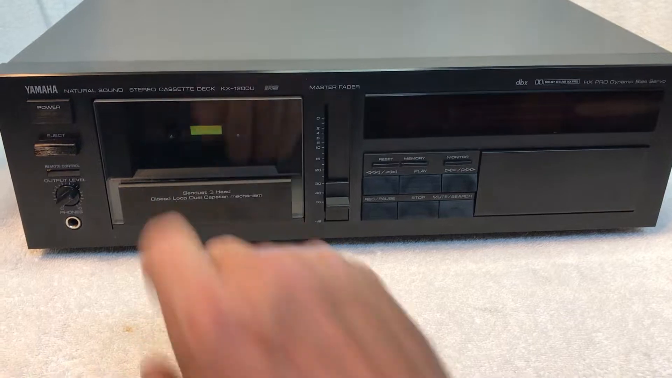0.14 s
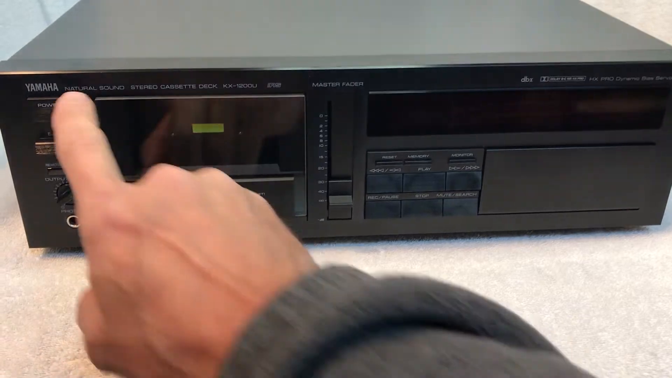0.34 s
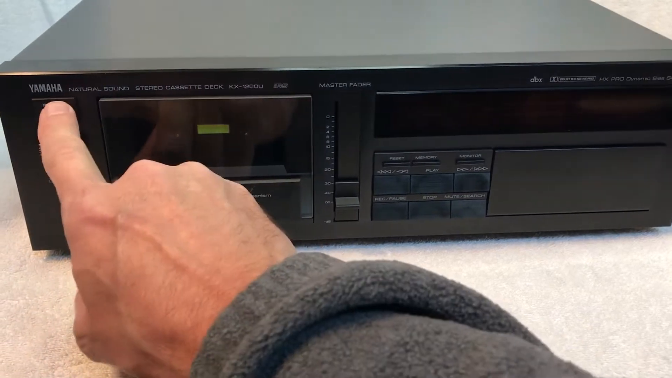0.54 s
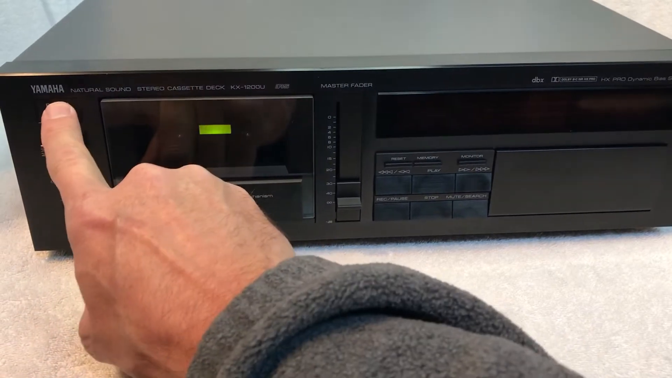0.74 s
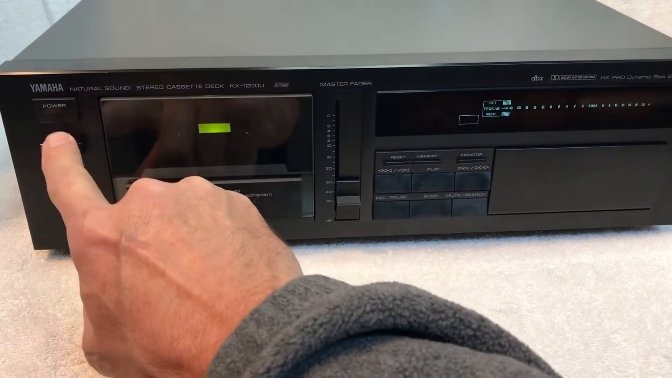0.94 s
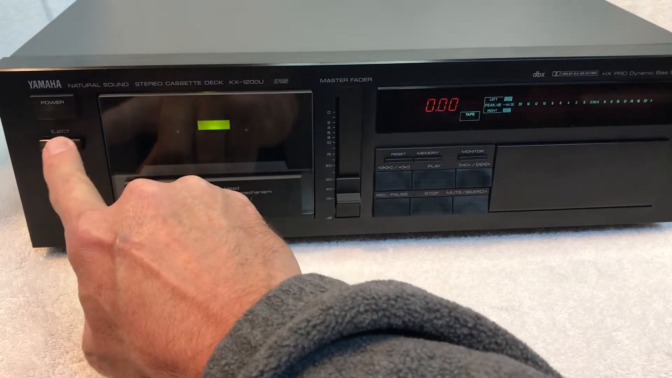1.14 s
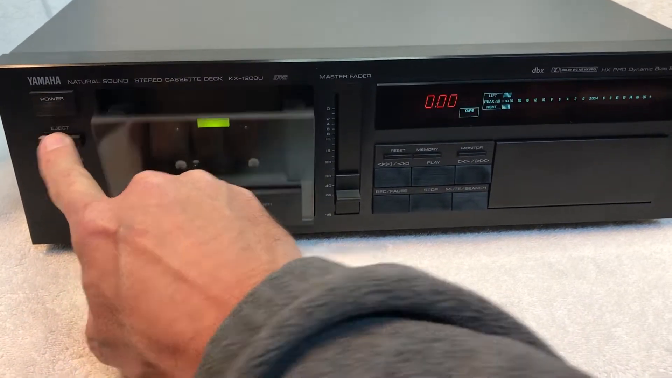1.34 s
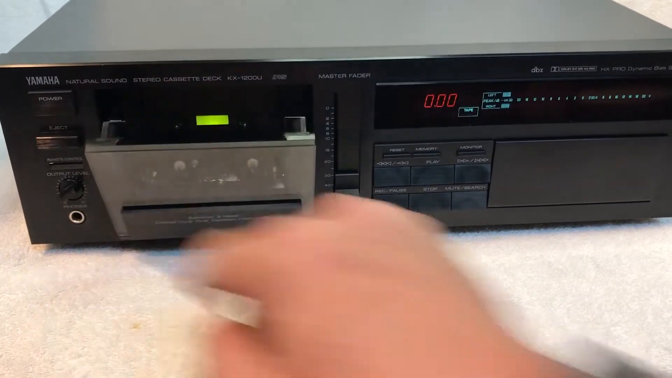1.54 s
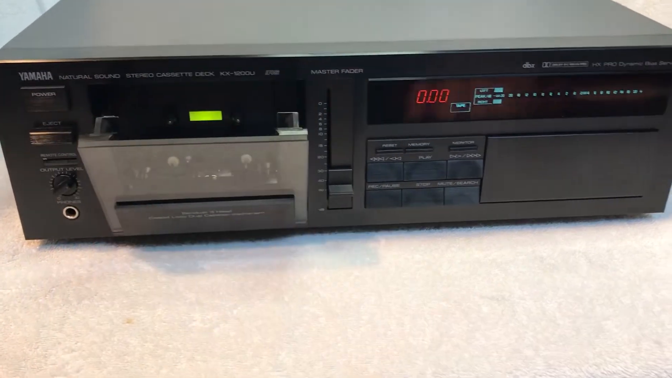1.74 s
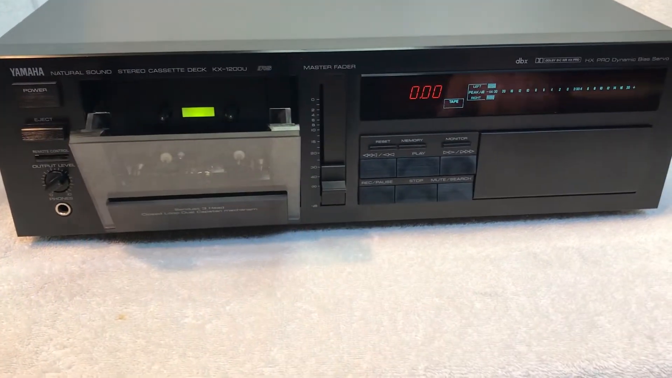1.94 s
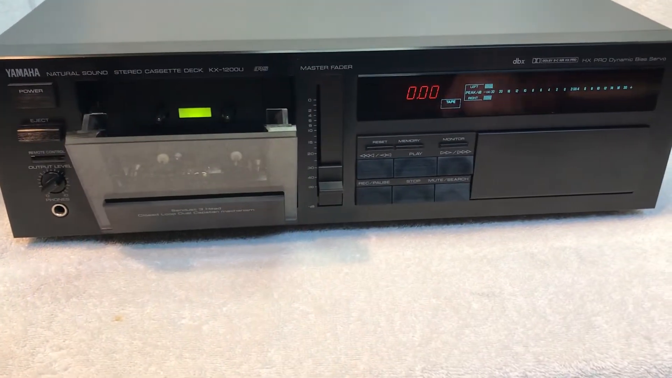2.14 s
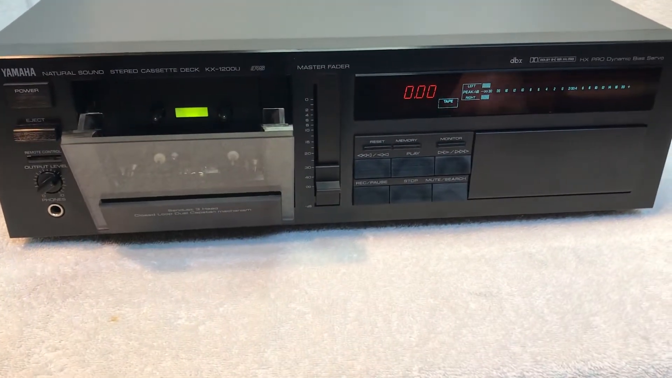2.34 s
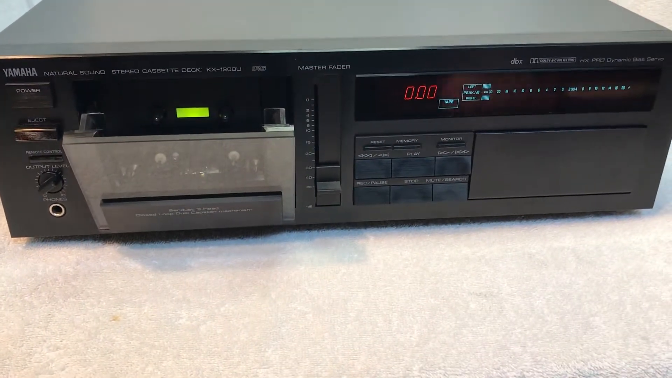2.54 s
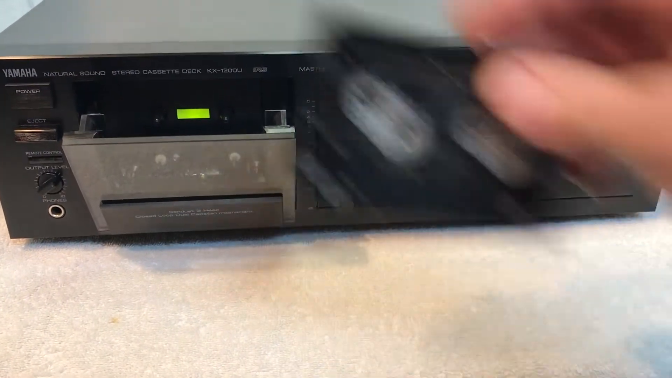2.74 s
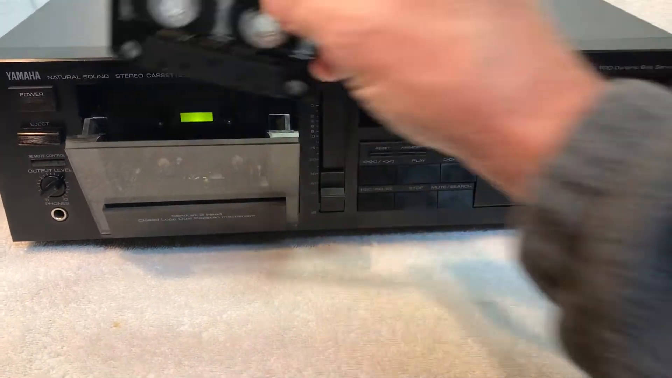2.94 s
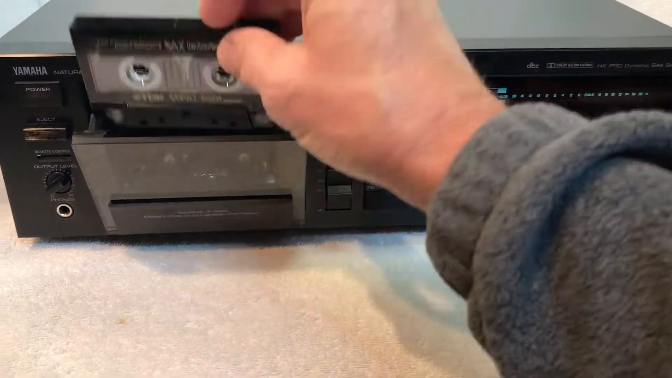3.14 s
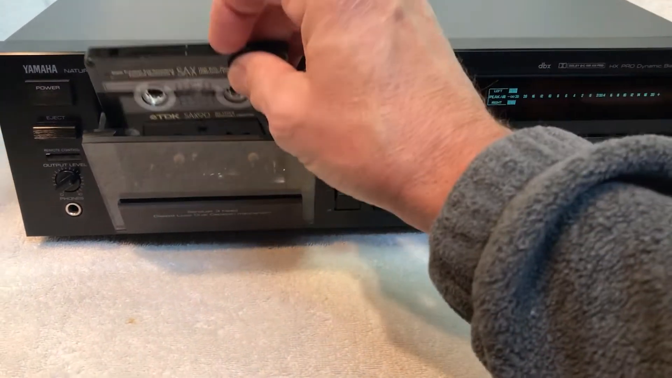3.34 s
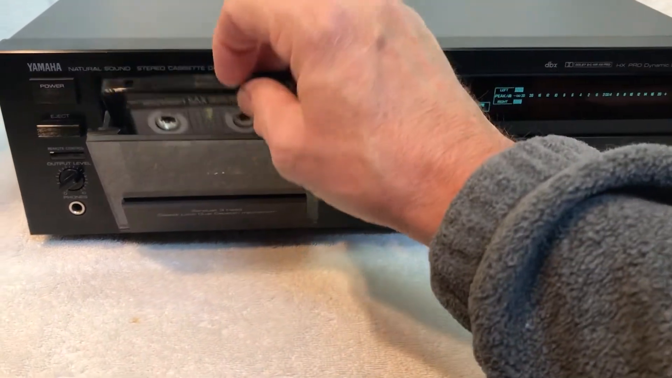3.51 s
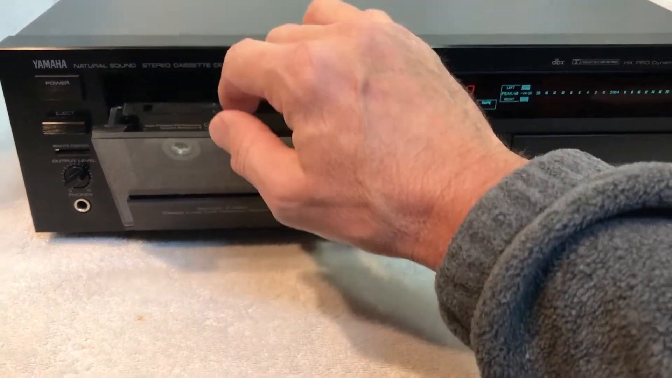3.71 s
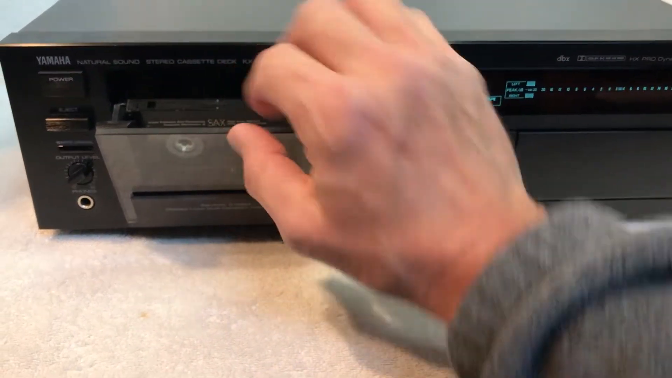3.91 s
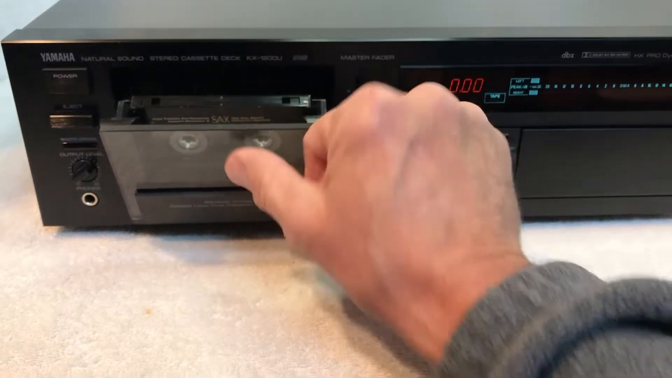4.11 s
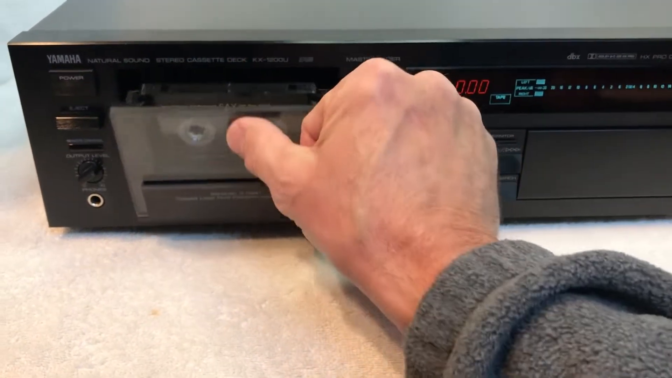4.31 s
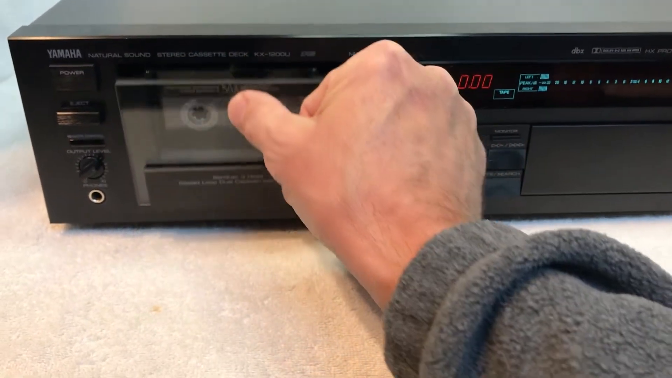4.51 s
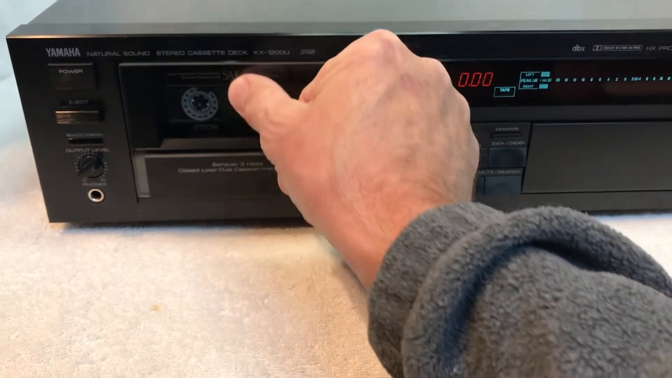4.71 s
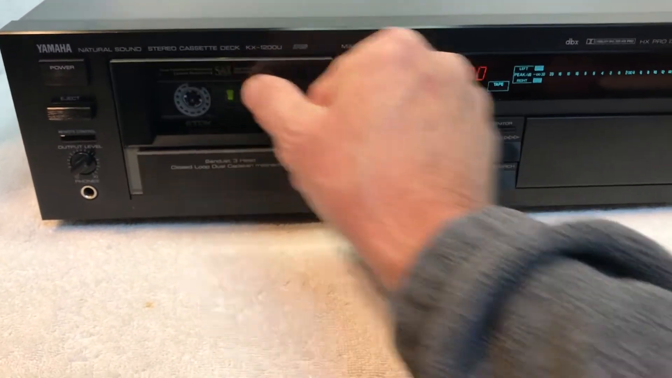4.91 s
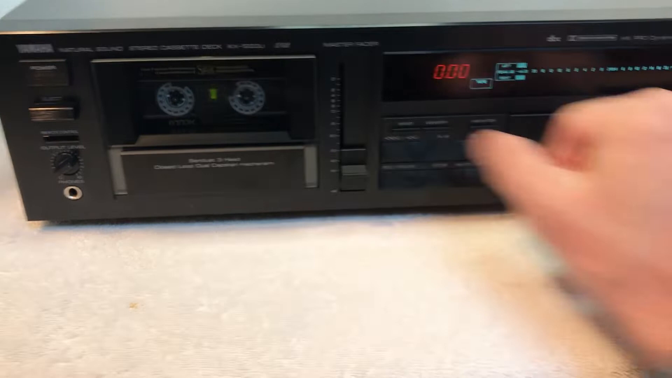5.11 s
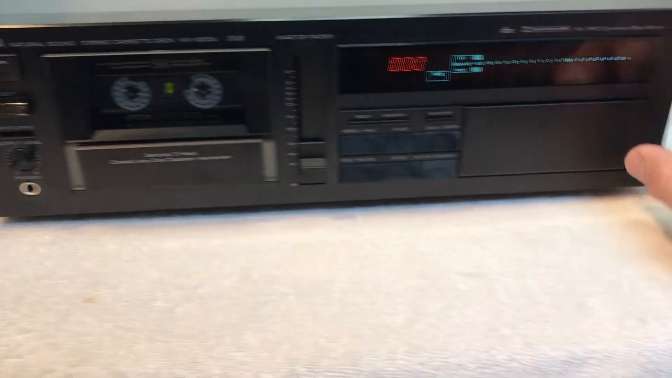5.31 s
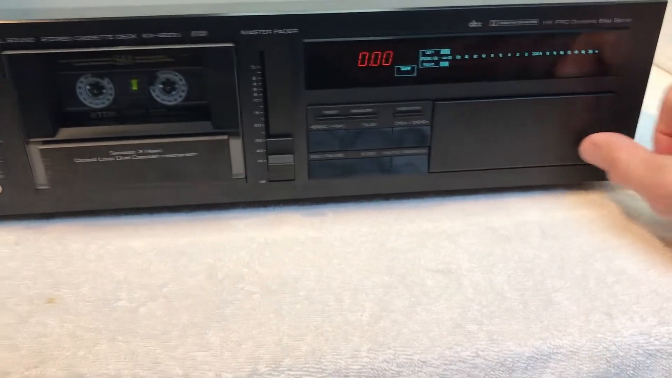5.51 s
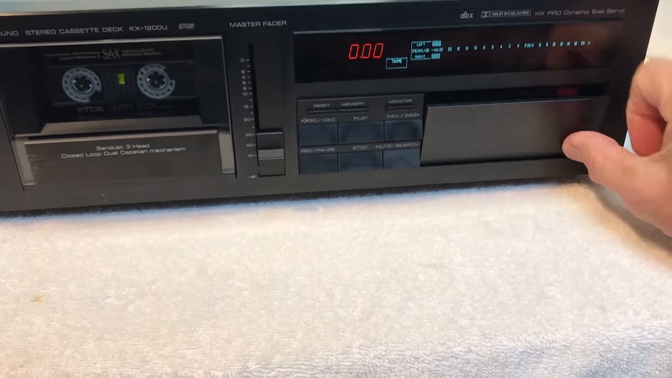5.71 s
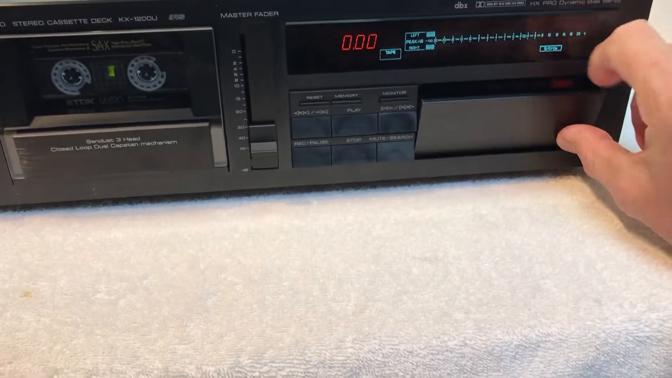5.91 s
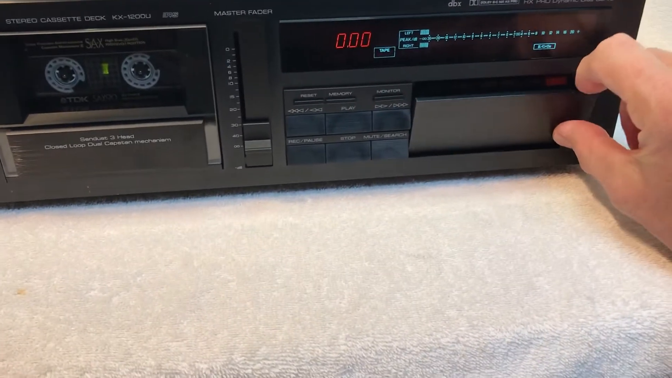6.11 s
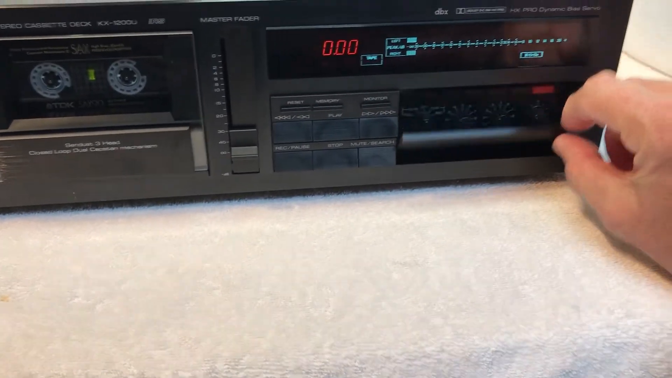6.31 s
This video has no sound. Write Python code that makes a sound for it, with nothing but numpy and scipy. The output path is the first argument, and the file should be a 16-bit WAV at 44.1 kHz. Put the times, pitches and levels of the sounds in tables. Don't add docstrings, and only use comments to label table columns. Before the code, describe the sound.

Dry plastic knocks on a deck standing on a towel, recorded about half a metre away. Keys click, the door clacks open, loose tape hubs chatter in the hand, and the shell scrapes down its guides to a firm clunk. After light fumbling the door snaps shut loudly, then a small cover opens with muted clicks. Low case rumble and thin microphone hiss lie underneath.

```python
import sys
import numpy as np
from scipy import signal
from scipy.fft import rfft, irfft
from scipy.io import wavfile
from scipy.ndimage import uniform_filter1d

SR = 44100
rng = np.random.default_rng(int(sys.argv[2]) if len(sys.argv) > 2 else 0)


def invert_db(level):
    return 10 ** (np.asarray(level, dtype=float) / 20)


def file_out(sig):
    cols = np.atleast_2d(sig).T
    lim = np.clip(cols, -1, 1)
    pcm = np.round(lim * 32767).astype(np.int16)
    wavfile.write(sys.argv[1], SR, pcm)


N = 280035


def band(x, lo_hz, hi_hz, order=2):
    return signal.sosfilt(signal.butter(order, [lo_hz, min(hi_hz, SR / 2.2)], "band", fs=SR, output="sos"), x)


def level(x, rms_db):
    return x * invert_db(rms_db) / np.sqrt(np.mean(x ** 2))


def decay(t, t60_s):
    return np.exp(-np.log(1000) * t / t60_s)


def coloured(points):
    hz, db = np.transpose(points)
    bin_hz = np.arange(N // 2 + 1) * SR / N
    gain = invert_db(np.interp(np.log(bin_hz + 1), np.log(hz), db))
    return irfft(rfft(rng.standard_normal(N)) * gain, N)


def flicker(rate_hz, spread_db):
    k = int(SR / rate_hz)
    steps = np.repeat(rng.standard_normal(N // k + 1), k)
    return invert_db(spread_db * uniform_filter1d(steps, k)[:N])


def pushed(t, pushes, rest_db, rise_db_s, fall_db_s):
    s, db = (c[:, None] for c in np.transpose(pushes))
    away_db = np.maximum(rise_db_s * (s - t), fall_db_s * (t - s))
    return np.sqrt(invert_db(rest_db) ** 2 + np.sum(invert_db(db - away_db) ** 2, axis=0))


def ring(modes, t):
    hz, db, t60_s = (c[:, None] for c in np.transpose(modes))
    chance = rng.standard_normal((3, len(modes), 1))
    gain = invert_db(db + 0.85 * chance[0]) * np.sign(chance[1])
    return np.sum(gain * decay(t, t60_s) * np.sin(2 * np.pi * hz * (1 + 0.013 * chance[2]) * t), axis=0)


def singing(t, parts):
    out, t = np.zeros(N + SR), t[:SR // 3]
    onset = np.clip(t / 0.00076, 0, 1)
    for s, hz, db, t60_s in parts:
        neighbours = level(band(rng.standard_normal(len(t)), hz * .97, hz * 1.03, order=1), -4.5)
        tone = np.sin(2 * np.pi * hz * t) + neighbours
        out[int(s * SR):][:len(t)] += invert_db(db) * tone * decay(t, t60_s) * onset
    return out[:N]


# f/Hz, density/dB
HISS = [(20, -32.5), (35, -9), (60, 5.5), (130, 7), (250, -5.5), (450, -3), (1000, -8), (2500, -10),
        (4800, -13.5), (6000, -12.5), (9300, -15), (10500, -16.5), (12000, -16), (15500, -21)]


def microphone_hiss():
    return level(coloured(HISS), -72) * flicker(12.0, 0.37)


# from t/s, to t/s
OVERLOAD = [
    (1.471, 1.868),
    (4.83, 5.222),
]
# f/Hz, density/dB
COARSE_HISS = [(100, -9.5), (600, -0.5), (1500, -3), (4000, -3.5), (8500, -7.5), (10500, -9),
               (15500, -10.5)]


def coarse_range_hiss(t):
    held = sum((t > start) & (t < end) for start, end in OVERLOAD)
    return held * level(coloured(COARSE_HISS), -65)


def room(x, t):
    t = t[:SR // 2]
    noise = rng.standard_normal(len(t)) * np.clip(t / 0.0054, 0, 1)
    low = band(noise, 150, 2200) * decay(t, 0.23)
    high = invert_db(-0.5) * band(noise, 4500, 13000) * decay(t, 0.1)
    tail = low + high
    return signal.fftconvolve(x, tail * invert_db(-16.5) / np.sqrt(np.sum(tail ** 2)))[:N]


# t/s, level/dB
THUDS = [(0.181, -73), (.8, -65), (1.27, -70), (1.47, -61), (1.66, -60.5), (3.27, -66), (3.59, -71),
         (3.8, -57.5), (4.33, -66), (4.76, -79), (5.31, -82), (6.07, -63), (6.33, -79)]


def table_thuds(t):
    thud = band(rng.standard_normal(N), 41, 80, order=3)
    return level(thud, 0) * pushed(t, THUDS, rest_db=-80.5, rise_db_s=260, fall_db_s=190)


# f/Hz, width/Hz, level/dB
CASE_RINGS = [(131.4, 10, 2), (187, 20, -0.5), (224, 41, 2), (249.5, 16, 4.5), (308.6, 30, -22.5)]
# t/s, level/dB
SHOVES = [(.2, -85), (.76, -58.5), (.96, -59), (1.333, -51.5), (1.47, -50.5), (1.58, -56.5), (1.67, -57.5),
          (3.378, -51.5), (3.55, -54.5), (3.69, -55), (3.799, -46.5), (3.92, -59.5), (4.07, -68),
          (4.33, -57), (4.55, -64), (4.69, -59), (4.831, -46), (4.96, -48.5), (5.575, -63), (5.62, -51.5),
          (5.715, -53), (5.779, -52), (6.08, -69.5), (6.2, -67.5)]


def case_drone(t):
    drone = np.zeros(N)
    for hz, width_hz, db in CASE_RINGS:
        mode = band(rng.standard_normal(N), hz - width_hz / 2, hz + width_hz / 2, order=1)
        drone += level(mode, db) * flicker(13, 2.5)
    return level(band(drone, 112, 1100), 0) * pushed(t, SHOVES, rest_db=-73.5, rise_db_s=243, fall_db_s=84.5)


# t/s, f/Hz, peak level/dB, t60/s
SINGING = [(1.468, 430, -47, .45), (1.468, 712, -56, .43), (3.78, 765, -53, .4), (3.78, 644, -51, .4),
           (3.781, 445, -49, .3), (.755, 6550, -58, 0.16), (2.707, 5280, -39, .04),
           (3.345, 11200, -53, 0.089), (3.776, 2350, -27, 0.04), (3.777, 1101, -30.5, .1),
           (3.78, 320.7, -45, 0.29), (.64, 950, -49, 0.067), (.95, 713, -52, 0.15),
           (3.8, 11050, -45, 0.062), (3.798, 2326, -29, 0.029), (4.724, 11200, -56, 0.17),
           (4.721, 4150, -56.5, 0.13), (4.837, 9580, -24.5, 0.022), (4.84, 1600, -33, 0.13),
           (4.276, 2330, -50, .04), (4.312, 2330, -47, .05), (4.707, 2350, -38, .04),
           (4.813, 208, -40, .12), (.753, 1050, -44, .08), (3.257, 560, -50, .06), (5.659, 2600, -46, .04),
           (5.578, 1780, -48, .05), (3.345, 3500, -50, .08), (6.155, 635.5, -64, 0.19),
           (6.21, 677, -71.5, 0.3)]
# t/s, f/Hz, peak level/dB
DECK_RINGS = [(.646, 1030, -47), (.768, 1030, -48), (.905, 4600, -46), (.905, 1010, -50), (.949, 700, -57),
              (0.95, 1900, -51), (1.233, 6030, -43), (1.234, 770, -56), (1.321, 750, -49),
              (1.326, 224, -46.5), (1.348, 200, -49), (1.387, 3090, -55), (1.467, 9600, -37.5),
              (1.471, 4070, -30.5), (1.47, 787, -41), (3.257, 1470, -48.5), (3.257, 3445, -56),
              (3.258, 5340, -52), (3.346, 1500, -42.5), (3.363, 5400, -44), (3.418, 2240, -57),
              (3.551, 1470, -51), (3.559, 4650, -55), (3.575, 2050, -53), (3.7505, 2200, -47.5),
              (3.756, 3480, -57), (3.776, 5730, -28), (3.7765, 7200, -33.5), (3.779, 3400, -32.5),
              (3.801, 5650, -46.5), (3.814, 6000, -53), (3.963, 1120, -56), (4.335, 2410, -59),
              (4.345, 2240, -57), (4.707, 5685, -48), (4.737, 2370, -42.5), (4.762, 2230, -50),
              (4.774, 1090, -51.5), (4.789, 2350, -52.5), (4.793, 2300, -51.5), (4.792, 4300, -55.5),
              (4.811, 8500, -39.5), (4.813, 1546, -32.5), (4.815, 2740, -37), (4.827, 8500, -28),
              (4.827, 3550, -25), (4.855, 6200, -48), (4.947, 644, -47), (4.95, 2910, -47),
              (5.576, 6960, -50), (5.585, 1860, -50), (5.665, 820, -50), (5.691, 5640, -53),
              (5.692, 3270, -57), (5.703, 4650, -56), (5.764, 4300, -58), (5.769, 2280, -45),
              (5.78, 1910, -54), (5.789, 7220, -54), (5.795, 1870, -53)]
# t/s, f/Hz, peak level/dB
SHELL_RINGS = [(2.213, 4300, -47), (2.26, 1600, -62), (2.274, 1680, -60), (2.283, 5740, -55),
               (2.388, 4480, -56), (2.4, 4630, -56), (2.466, 1700, -49), (2.488, 1070, -49),
               (2.496, 4100, -54), (2.498, 2930, -52), (2.503, 1860, -44), (2.512, 1040, -56),
               (2.695, 5400, -52), (2.714, 1140, -47), (2.716, 3240, -52), (2.881, 1070, -46),
               (2.889, 1110, -57), (2.906, 2320, -60), (2.921, 1280, -51), (2.93, 5400, -53),
               (2.934, 1200, -52), (2.954, 1250, -54), (2.959, 1140, -52), (2.965, 1800, -44),
               (2.984, 2900, -56), (2.993, 4650, -48), (3.025, 2340, -60), (3.172, 3270, -48),
               (3.182, 3260, -47), (3.633, 3270, -49), (3.655, 2400, -55), (3.675, 2070, -49),
               (3.686, 2400, -43)]


def small_parts(t):
    short = [(s, hz, db, 0.056 * (1000 / hz) ** 0.3) for s, hz, db in DECK_RINGS + SHELL_RINGS]
    return singing(t, SINGING) + singing(t, short)


# f/Hz, level/dB, t60/s
SHELL_MODES = [(1054, 2.5, 0.054), (1348, 3, 0.038), (1800, -7, 0.027), (2350, -4.5, 0.016),
               (2920, -9, 0.034), (4500, -11, .03), (5645, 17, 0.013), (6230, -0.5, 0.045),
               (11200, -12, .04)]
# start t/s, length/s, level/dB, centre f/Hz
RUSTLES = [(.044, 0.19, -76, 4000), (.313, 0.21, -70, 5400), (2.328, 0.072, -60.5, 4500),
           (2.365, 0.089, -56.5, 6060), (2.659, 0.075, -49.5, 5800), (4.074, 0.074, -69.5, 11000),
           (4.168, .1, -76.5, 3960), (5.301, 0.17, -65.5, 4880), (6.19, 0.15, -67.5, 10960)]
# start t/s, length/s, level/dB, centre f/Hz
SLIDES = [(1.406, 0.078, -65, 4020), (2.22, 0.087, -70, 2460), (2.406, 0.072, -62.5, 1800),
          (2.465, 0.06, -51.5, 2880), (2.538, 0.057, -71.5, 2530), (2.793, .1, -67, 6700),
          (2.87, 0.063, -71, 3900), (3.39, 0.095, -69, 3000), (3.44, 0.22, -67, 8600),
          (3.46, 0.079, -74.5, 2330), (3.718, 0.061, -60, 3000), (4.272, 0.12, -68, 2800),
          (4.45, 0.26, -77.5, 5160), (4.74, 0.097, -57, 3400), (5.728, 0.08, -54, 5960)]
# start t/s, length/s, level/dB, centre f/Hz
DRAGS = [(.625, 0.074, -61.5, 1294), (3.105, 0.079, -70, 2530), (3.33, 0.041, -57, 3780),
         (3.55, 0.029, -58, 3000), (3.64, 0.1, -65, 3520), (4.722, 0.035, -50.5, 4000),
         (5.555, 0.1, -61.5, 4020), (5.65, 0.043, -55, 2180), (5.68, 0.099, -67, 7000)]


def scrapes(t):
    out = np.zeros(N)
    short = t[:SR // 16]
    shell = invert_db(-37.5) * ring(SHELL_MODES, short) + (short == 0)
    grains = rng.standard_normal((2, N)) * flicker(600, 3.6) * flicker(90, 2.4)
    hum = signal.fftconvolve(grains[1], shell)[:N]
    panel = level(band(hum, 770, 1400) + band(hum, 1540, 2180) * invert_db(2.5), 0)
    # table, share of the length spent swelling, panel level/dB
    for table, share, panel_db in ((RUSTLES, 0.54, -12), (SLIDES, 0.64, 1.5), (DRAGS, 0.17, 5)):
        for start, length, db, hz in table:
            peak, end = start + share * length, start + length
            span = slice(int(start * SR), int(end * SR))
            swell = np.interp(t[span], (start, peak, end), (0, 1, 0)) ** 1.22
            grain = grains[0, span]
            rub = band(grain, hz / 2.0, hz * 1.63) + invert_db(-4.5) * band(grain, hz / 4, hz * 2.4, order=1)
            out[span] += swell * (level(rub, db) + invert_db(db + panel_db) * panel[span])
    return out


# t/s, peak level/dB
SNAPS = [(0.657, -54), (0.7526, -22), (2.217, -43), (2.4917, -47), (2.7079, -28), (2.995, -33),
         (3.001, -40), (4.8294, -17), (5.768, -36)]


def snaps():
    out = np.zeros(N)
    for s, db in SNAPS:
        out[int(s * SR)] += invert_db(db)
    return band(out, 1500, 14000, order=1) * invert_db(3.0)


def knocks(events, modes, wash, modes_db, wash_db):
    out, t = np.zeros(N + SR), np.arange(8192) / SR
    size = 2 * len(t)
    click = t == 0
    registers = [rfft(band(click, lo_hz, hi_hz, order=3), size) for lo_hz, hi_hz, _ in wash]
    fades = [invert_db(wash_db) * (decay(t, t60_s) + 2.6 * np.exp(-t / 0.00044)) for _, _, t60_s in wash]
    for table, edge_db, edge_slope, chatter_ms in events:
        for s, peak_db, panel_db, bright_db in table:
            noise = rng.standard_normal((3, len(t)))
            contacts = noise[0] * invert_db(1.8 * noise[1]) * np.exp(-1000 * t / chatter_ms) * 0.14
            contacts[0] += .55
            blow = rfft(contacts, size)
            clear = invert_db(modes_db) * ring(modes, t) + click
            i = int(s * SR)
            register_db = (panel_db, 0, bright_db, edge_db + edge_slope * bright_db)
            for register, fade, db in zip(registers, fades, register_db):
                part = irfft(blow * register * rfft(clear + fade * noise[2], size))[:len(t)]
                out[i:i + len(t)] += part * invert_db(peak_db + db) / np.abs(part).max()
    return out[:N]


# t/s, peak level/dB, panel level/dB, bright level/dB
SHELL_KNOCKS = [(2.2019, -45, -18, -19), (2.2127, -38.5, -25, 1.5), (2.2179, -41, -10, -1),
                (2.2827, -48, -10, -1.5), (2.427, -46.5, -13, 3.5), (2.4662, -53.5, 4, 4),
                (2.4893, -42, -2, -8), (2.6898, -54, 1, 8), (2.7078, -36, -9, 0.5), (2.7124, -37, -3.5, -2),
                (2.8809, -49.5, 2, -2), (2.9199, -36, -9, -2), (2.9339, -36.5, -14, 0),
                (2.9461, -42.5, -6, -10), (2.9651, -39, -4, -10), (2.9791, -40, -24, -1),
                (2.9943, -35, -10, 2.5), (3.0254, -55, 3.5, -9), (3.1135, -62, 6.5, 3),
                (3.1724, -36, -17, 1.5), (3.1818, -35.5, -40, -1.5)]
# t/s, peak level/dB, panel level/dB, bright
# level/dB
SLOT_KNOCKS = [(2.3009, -75, -5, 14), (3.6302, -35.5, -19.5, 0.5), (3.6461, -45, -12.5, -2.5),
               (3.6751, -41, -15.5, -5.5), (3.6847, -39.5, -15.5, -5), (3.6898, -52, 8.5, -4.5),
               (3.6998, -38.5, -24, -8.5)]
# from f/Hz, to f/Hz, t60/s
SHELL_WASH = [(790, 1940, 0.066), (1610, 5220, 0.05), (4500, 7900, 0.006), (9400, 17000, 0.036)]


def cassette_knocks():
    # table, edge level/dB at bright 0, edge dB per bright dB, chatter/ms
    events = [(SHELL_KNOCKS, -23, 1, 1.63), (SLOT_KNOCKS, -5, 1.4, 2.2)]
    return knocks(events, SHELL_MODES, SHELL_WASH, modes_db=-34, wash_db=-22.0)


# f/Hz, level/dB, t60/s
DECK_MODES = [(688.3, -8.5, 0.19), (775, -6.5, 0.069), (1069, 1, 0.047), (1440, -16, 0.1),
              (1550, -22.5, .05), (2350, -6.5, 0.085), (2711, 1.5, 0.043), (3205, 1, 0.0554),
              (4160, -25, .04), (6460, 0.5, 0.017), (9440, -6.5, .03), (14800, -29.5, .025)]
# from f/Hz, to f/Hz, t60/s
DECK_WASH = [(504, 1417, 0.14), (1400, 4920, 0.081), (4500, 8170, 0.043), (9860, 15900, 0.025)]
# t/s, peak level/dB, panel level/dB, bright level/dB
BLOWS = [(.7505, -35.5, -8.5, 1), (.7528, -32, -41, 0.5), (.7548, -59, 0, -6), (.7615, -56, 0, 8),
         (.7695, -48, 3.5, 2), (1.4592, -34.5, -23, 3), (1.4622, -27.5, -18, 4), (1.4662, -21, -14, -2),
         (1.4688, -24.5, -6.5, -1), (1.474, -29.5, -11.5, -3), (3.7695, -28.5, -3, 1.5),
         (3.7765, -23, -13.5, 1), (3.7795, -26, -13, 1.5), (3.7865, -44, -7, -9), (3.7985, -35, -21, 1.5),
         (4.8102, -27, -3.5, -1.5), (4.814, -24, -5.5, -5), (4.8248, -19, -8.5, -0.5),
         (4.8275, -18.5, -17, 0), (4.832, -23.5, -3, -6), (4.8372, -20.5, -6, 5)]
# t/s, peak level/dB, panel level/dB, bright level/dB
KEY_KNOCKS = [(.6256, -54.5, -0.5, -11), (.64, -57, 7.5, -20), (.6468, -53.5, 6, -20), (.655, -46, -16, -5),
              (.8965, -47.5, 2, 3), (.9032, -42, -3, -3), (.9085, -39, -5, -8), (.9458, -48, 2.5, -4.5),
              (.952, -55.5, 12.5, -16), (1.1781, -58, 0, 0.5), (1.2331, -39, -5, 0), (1.2513, -49, -10, 6),
              (1.301, -42, -15, -5.5), (1.3189, -40.5, -5.5, -13), (1.386, -50, -21.5, -15.5)]
# t/s, peak level/dB, panel level/dB, bright level/dB
GUIDE_KNOCKS = [(3.2566, -42, -0.5, -4.5), (3.3345, -44, -1, -14), (3.3458, -30, -10.5, 3.5),
                (3.352, -36, -17, 2), (3.3642, -38.5, -28, 5), (3.3866, -43.5, -7, -17),
                (3.4177, -50.5, 0, -3), (3.5507, -41, -12.5, -23), (3.5732, -46, -12, -6),
                (3.9516, -56.5, -23, -1), (3.9628, -46.5, -10.5, -7), (4.2757, -49, -5, 0),
                (4.2847, -58, -8, 7.5), (4.3113, -47, -10.5, -4), (4.344, -47.5, -11, -11)]
# t/s, peak level/dB, panel level/dB, bright level/dB
DOOR_KNOCKS = [(3.7505, -52, -6, 0.5), (4.6142, -54, -4, -18), (4.6433, -49, 2, -12.5),
               (4.6568, -54.5, -12, 5.5), (4.6662, -52.5, -18, 6.5), (4.7071, -38, -1.5, -2),
               (4.7381, -36.5, -3, -8), (4.7618, -45, 3, -11), (4.9505, -42, -3, 2), (4.9565, -43, 0, 0),
               (5.5552, -61, 10, -11.5), (5.5641, -53.5, -4, 5), (5.5753, -44.5, 2.5, -2),
               (5.6462, -51, 3, -18), (5.6581, -40.5, 2.5, -9.5), (5.6896, -46.5, -14, 3),
               (5.7029, -44, -16, 2), (5.7232, -55.5, 9.5, -1), (5.7554, -40.5, -1, -4.5),
               (5.7766, -46, 1, 0.5)]


def deck_knocks():
    # table, edge level/dB at bright 0, edge dB per bright dB, chatter/ms
    events = [(BLOWS, -2.5, 0.47, 2.37), (KEY_KNOCKS, -12.5, 3.1, 1.97),
              (GUIDE_KNOCKS, -12, 0.65, 0.84), (DOOR_KNOCKS, -2, 1.4, 3.1)]
    return knocks(events, DECK_MODES, DECK_WASH, modes_db=-30.0, wash_db=-20.5)


def scene():
    t = np.arange(N) / SR
    near = deck_knocks() + cassette_knocks() + scrapes(t) + snaps()
    return (near + room(near, t) + small_parts(t) + case_drone(t) + table_thuds(t))[None]


# f/Hz, width/Hz, depth (-1 to 1)
DIPS = [(7820, 840, 0.48), (10550, 440, 0.62), (15600, 1200, -0.25)]


def microphone_port(x):
    for hz, width_hz, depth in DIPS:
        x = x - depth * band(x, hz - width_hz / 2, hz + width_hz / 2, order=1)
    return x


def band_limit(x):
    return signal.sosfilt(signal.butter(12, 16810, fs=SR, output="sos"), x)


def record(dry):
    t = np.arange(N) / SR
    x = microphone_port(dry + microphone_hiss()) + coarse_range_hiss(t)
    x = signal.sosfilt(signal.ellip(6, .3, 18, 15800, fs=SR, output="sos"), x)
    return band_limit(x)


dry = scene()
out = record(dry)
file_out(out)
```